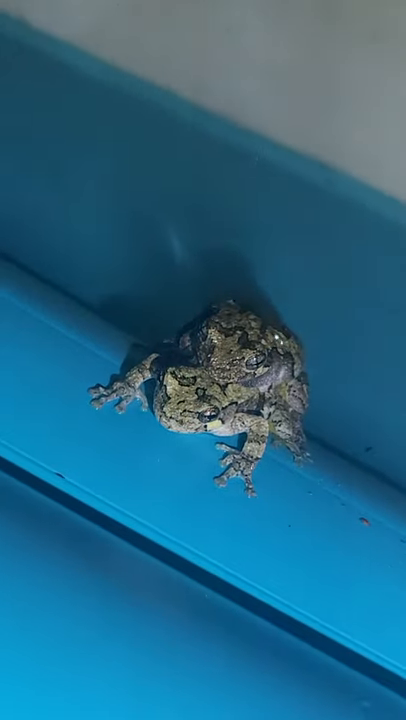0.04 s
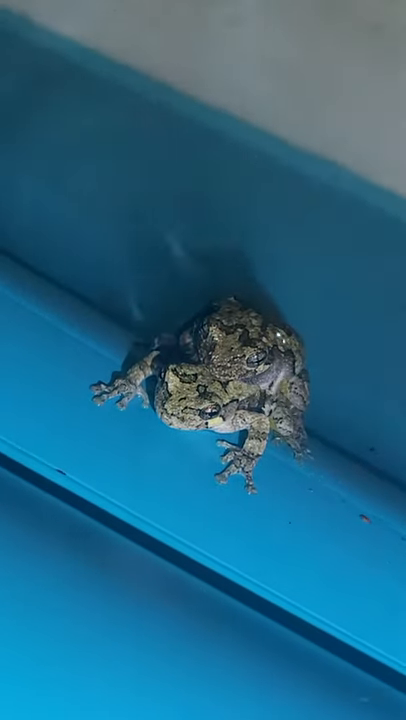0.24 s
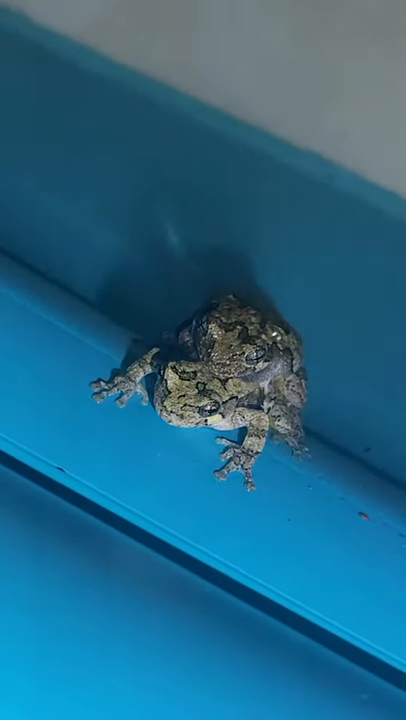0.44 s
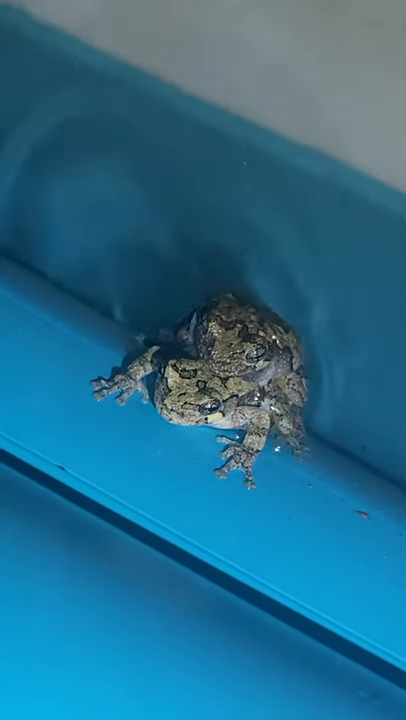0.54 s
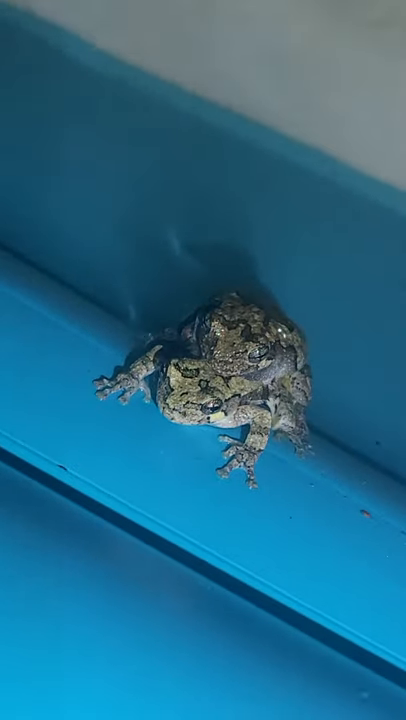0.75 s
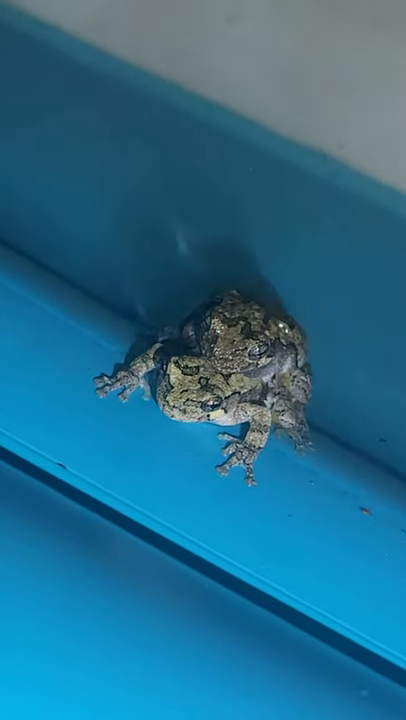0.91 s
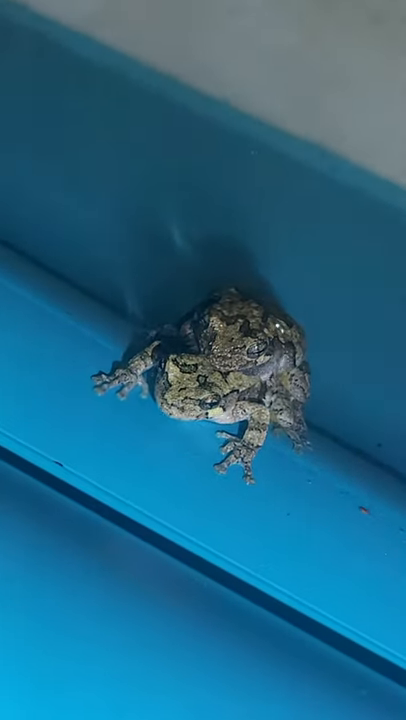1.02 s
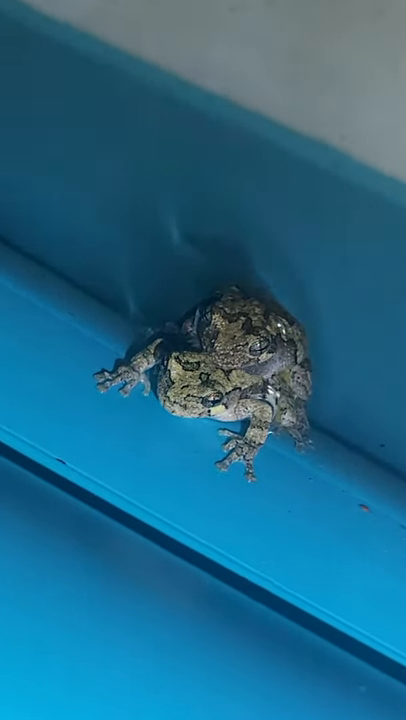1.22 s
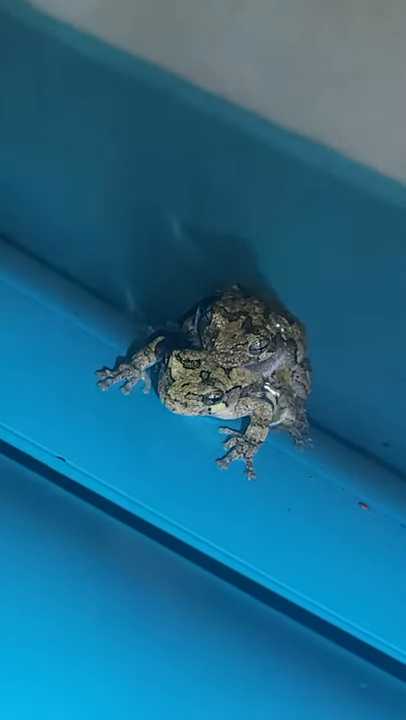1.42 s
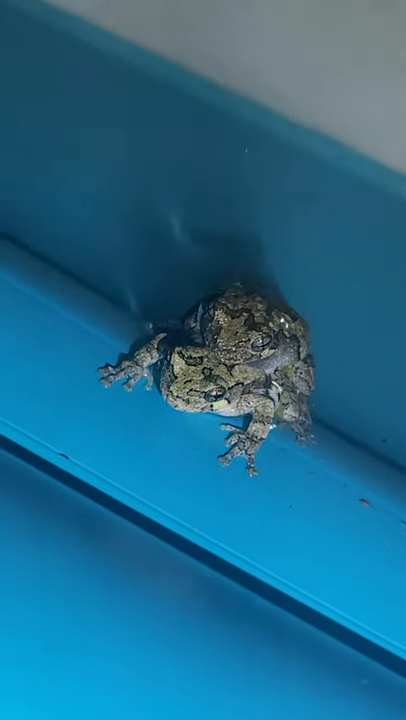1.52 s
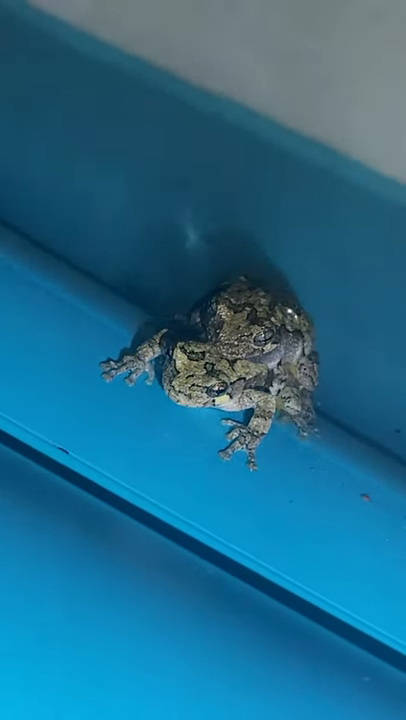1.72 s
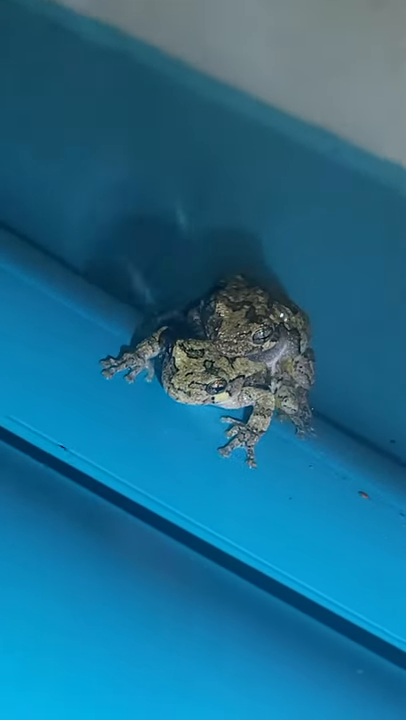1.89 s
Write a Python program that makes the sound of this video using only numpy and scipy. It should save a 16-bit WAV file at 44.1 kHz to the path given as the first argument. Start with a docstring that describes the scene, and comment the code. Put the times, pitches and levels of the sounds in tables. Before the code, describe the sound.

A tree frog trills once, loud and close, from about 0.2 to 0.7 seconds: a rapid, even row of high chirping pulses that swells quickly and stops with a very brief echo. Just before it, at 0.1 seconds, comes a soft double microphone bump, with a fainter bump near 1.7. A quiet outdoor hiss, faint distant night chorus and low rumble continue until about 2 seconds.

```python
"""Outdoors at night, a tree frog on a plastic ledge gives one loud trill, close by.
The trill is a row of pulses, each a short upward chirp with a snap that rings the frog's throat pouch.
In most pulses the octave (twice the pitch) is far louder than the base tone. Nearby walls answer briefly.
Behind the frog lie a quiet hiss, a far chorus, a low rumble and a few soft bumps."""
import sys
import numpy as np
from scipy import signal
from scipy.fft import rfft, irfft
from scipy.io import wavfile
from scipy.ndimage import uniform_filter1d

SR = 44100
rng = np.random.default_rng(int(sys.argv[2]) if len(sys.argv) > 2 else 0)


def pcm_store(signal):
    """Save signal as 16-bit PCM."""
    levels = np.round(np.clip(np.atleast_2d(signal), -1, 1) * 32767)
    wavfile.write(sys.argv[1], SR, levels.astype(np.int16).T)


N = 85995
TIME = np.arange(N) / SR
FREQS = np.maximum(np.arange(N // 2 + 1) * SR / N, 1)

# how alike the background is in both ears: (frequency [Hz], likeness [1 = same, 0 = unrelated])
EAR_LIKENESS = [(60, .95), (130, 0.95), (300, 0.89), (700, 0.17), (2000, -0.13), (3000, -.1),
                (6000, -0.079), (14000, -0.1)]


def from_db(db):
    """Turn decibels into a number to multiply by."""
    return 10 ** (np.asarray(db) / 20)


def rms_one(x):
    """Scale a sound so that its average strength (rms) is one."""
    return x / np.sqrt(np.mean(x ** 2) + 1e-20)


def along(rows, at):
    """Read a table between its rows, looking up `at` in the first column."""
    first, *columns = np.transpose(rows)
    return [np.interp(at, first, column) for column in columns]


def over_hz(points):
    """Read a table at every frequency, giving each octave equal room."""
    hz, values = np.transpose(points)
    return np.interp(np.log(FREQS), np.log(hz), values)


def pan(db):
    """Left and right gains that make the left louder by `db`."""
    return from_db(np.array([[.5], [-.5]]) * db)


def resonate(x, hz, width_hz):
    """Let a sound ring around one pitch, with gain one at that pitch."""
    r = np.exp(-np.pi * width_hz / SR)
    feedback = [1, -2 * r * np.cos(2 * np.pi * hz / SR), r * r]
    return signal.lfilter(np.array([1, 0, -1]) * (1 - r * r) / 2, feedback, x + 1e-18)


def noise(spectrum, pan_db=0, likeness=EAR_LIKENESS):
    """Stereo noise of strength one, with a given tone colour, balance and likeness between the ears."""
    mid, side = rfft(rng.standard_normal((2, N)))
    alike = np.clip(over_hz(likeness), -1, 1)
    both = np.sqrt(1 + alike) * mid + np.sqrt(1 - alike) * side * [[1], [-1]]
    return rms_one(irfft(both * from_db(over_hz(spectrum)) * pan(pan_db), N))


def delay(x, ms):
    """The same sound, later."""
    return irfft(rfft(x) * np.exp(-2j * np.pi * FREQS * ms / 1000), N)


def far_chorus():
    """Other night callers, far away, blur into narrow bands of noise."""
    # the callers' bands: (pitch [Hz], width [Hz], level next to the hiss [dB])
    bands = [(2014, 86, -15.5), (3007, 340, -4), (6659, 150, -13)]
    chorus = 0
    for hz, width, db in bands:
        band = resonate(rng.standard_normal((2, N)), hz, width)
        chorus += from_db(db) * rms_one(resonate(band, hz, 2 * width))
    return chorus


def night_hiss():
    """A quiet hiss swells and fades together with the far chorus; its airy top drifts on its own."""
    # tone colour of the hiss and of its airy top: (frequency [Hz], relative level [dB])
    hiss_colour = [(200, 0), (400, -2.5), (700, -4.5), (1100, -8), (1700, -5.5), (2050, -3.5), (2400, -6.5),
                   (3700, -4), (4600, 2), (5700, .5), (6300, -2), (6750, -1.5), (7300, -21.5),
                   (9500, -26.5), (15800, -25)]
    air_colour = [(7000, -26), (9500, -16), (11500, 0.5), (15800, 1.5)]
    # loudness of each: (time [s], level [dB])
    hiss_level = [(0, -45), (.2, -42.5), (.32, -51), (.9, -53), (1.05, -54), (1.22, -52), (1.42, -49),
                  (1.58, -47.5), (1.78, -48), (1.95, -49.5)]
    air_level = [(0, -57), (.22, -55), (.75, -60.5), (.92, -57.5), (1.06, -65.5), (1.2, -62.5), (1.45, -54),
                 (1.75, -54), (1.87, -64), (1.95, -63)]
    hiss = from_db(along(hiss_level, TIME)[0]) * (far_chorus() + noise(hiss_colour))
    air = from_db(along(air_level, TIME)[0]) * noise(air_colour)
    return hiss + air


def rumble():
    """Deep noise that dips during the trill and slowly comes back."""
    # tone colour: (frequency [Hz], relative level [dB])
    colour = [(22, -24), (34, -14), (43, 1), (62, 2), (82, -6.5), (108, -1.5), (138, -14.5), (170, -11),
              (210, -20), (320, -29), (700, -36.5), (1500, -52)]
    # loudness: (time [s], level [dB])
    level = [(0, -37.5), (.22, -42), (.3, -56), (.4, -50.5), (.7, -48.5), (.85, -47), (1.1, -44),
             (1.22, -45), (1.35, -42.5), (1.5, -45), (1.72, -42.5), (1.95, -44.5)]
    return from_db(along(level, TIME)[0]) * noise(colour)


def bumps():
    """Each soft bump on the microphone is a low swing that dies quickly, with a little scuff."""
    # the bumps: (start [s], peak level [dB], pitch [Hz])
    hits = [(0.087, -29, 143), (0.113, -28.5, 136), (1.677, -36.5, 129)]
    rise_s, scuff_db, scuff_top_hz = 0.0024, -12, 477
    keep_lows = signal.butter(3, scuff_top_hz, fs=SR, output="sos")
    scuff = from_db(scuff_db) * rms_one(signal.sosfilt(keep_lows, rng.standard_normal((2, N))))
    out = 0
    for start, db, hz in hits:
        age = np.maximum(TIME - start, 0)
        loudness = from_db(db) * age / rise_s * np.exp(1 - age / rise_s)
        out += loudness * (np.sin(2 * np.pi * hz * age) + scuff)
    return out


def voice_phase(glide):
    """How far the voice's vibration has turned, in radians; its pitch glides and wavers a little."""
    # base tone at the pulse peaks, rising as the throat fills: (time [s], pitch [Hz])
    pitch = [(.215, 1166), (.239, 1322), (.262, 1351), (.3, 1372), (.39, 1409), (.49, 1420), (.71, 1406)]
    waver_depth, waver_band_hz = 0.0069, [155, 310]
    keep_band = signal.butter(2, waver_band_hz, "band", fs=SR, output="sos")
    waver = rms_one(signal.sosfilt(keep_band, rng.standard_normal(N)))
    hz = along(pitch, TIME)[0] * glide * (1 + waver_depth * waver)
    return 2 * np.pi * np.cumsum(hz) / SR


def throat_pouch(pulse_time, phase, base_db):
    """A snap at the top of each pulse rings the frog's throat pouch (its vocal sac)."""
    # the pouch's ringing tones: (pitch [Hz], width [Hz], gain [dB])
    rings = [(1142, 170, -10), (1627, 217, 11), (3040, 620, 11.5)]
    snap_at, snap_width, octave_db, limit_db = 0.07, 0.34, -6.5, -12
    burst = np.exp(-((pulse_time - snap_at) / snap_width) ** 2)
    strength = from_db(np.minimum(base_db, limit_db))   # grows with the base tone, up to a limit
    snap = strength * burst * (np.sin(phase) + from_db(octave_db) * np.sin(2 * phase))
    return sum(from_db(db) * resonate(resonate(snap, hz, width), hz, width) for hz, width, db in rings)


def voice_rasp(octave_gain, pulse_db):
    """A fine rasp rises and falls with the octave, stronger in the louder pulses."""
    # tone colour: (frequency [Hz], relative level [dB])
    colour = [(700, -30), (1100, -10.5), (2200, -14.5), (3300, -0.5), (3750, -6), (4300, 9), (4900, -6.5),
              (5900, 0.5), (7900, -27), (8400, -11.5), (9900, -2.5), (11200, -12.5), (12800, -19),
              (13450, 4), (14300, -15.5), (15700, -23)]
    # which side it leans to: (frequency [Hz], left minus right [dB])
    balance = [(4000, -1.5), (8500, 5), (10000, -8.5), (13500, -10.5)]
    # how alike it is in both ears: (frequency [Hz], likeness [1 = same])
    likeness = [(1000, .6), (14000, 0.44)]
    loudness = from_db(pulse_db - 32) * octave_gain ** 0.72
    return loudness * noise(colour, over_hz(balance), likeness)


def voice():
    """One vibration swells and glides up in each pulse; gives a lower part, an upper part and a rasp."""
    # the pulses of the trill: (peak time [s], base tone level [dB], octave level [dB])
    pulses = [(0.2167, -19, -18), (.239, -5.5, -15), (0.2593, -4.5, -4.5), (0.2799, -12.5, -2.5),
              (0.2982, -14, -1.6), (0.3179, -15, -1), (0.3378, -17.5, -0.5), (.358, -14, -1.5),
              (0.3773, -16, -0.47), (.397, -16, -0.9), (0.4158, -14.5, -1.2), (.4357, -15.5, -0.55),
              (0.4539, -17, -0.7), (0.4739, -14.5, -1.55), (0.494, -16, -0.7), (0.5124, -15.5, -1.3),
              (0.53, -18.5, -0.92), (0.5508, -15, -1), (0.569, -16, -1.54), (0.5893, -15.5, -1.27),
              (.6083, -17.5, -1.9), (0.6265, -14.5, -1.04), (0.6473, -14.5, -0.97), (0.6658, -16.5, -0.74),
              (0.6855, -14.5, -1.1857), (0.7068, -17.5, -0.6)]
    # course of a pulse: (time from peak before stretching [ms], pitch [ratio], base tone [dB], octave [dB])
    shape = [(-6, .923, -35.5, -48), (-5.5, .96, -10.5, -31.5), (-4, .95, -4, -8), (-3, .935, -2, -7),
             (-1.4, .972, -2.5, -1.16), (0, 1, -1.5, -0.3), (1, 1.04, 0.5, -2.5), (3, 1.075, -10, -16.5),
             (5, 1.055, -19, -21), (9, .953, -31, -49.5)]
    # early pulses swell faster, and some ring longer: (time [s], rise length [ratio], fall length [ratio])
    stretch = [(.215, 0.8, 0.56), (.24, 0.653, 1.7), (.26, 0.63, 1.26), (.3, 0.95, .95), (.6, .98, 1.0),
               (.71, 0.812, 0.87)]
    # weak higher tones: (pitch [multiple of the base tone], level next to the octave [dB])
    overtones = [(3, -31.5), (4, -38.5), (5, -52.5)]
    peak_s, base_db, octave_db = np.transpose(pulses)
    nearest = np.searchsorted((peak_s[1:] + peak_s[:-1]) / 2, TIME)   # which pulse each moment is in
    from_peak_ms = (TIME - peak_s[nearest]) * 1000
    rise, fall = along(stretch, TIME)
    pulse_time = from_peak_ms / np.where(from_peak_ms < 0, rise, fall)
    glide, base_shape_db, octave_shape_db = along(shape, pulse_time)
    in_pulse = (pulse_time > shape[0][0]) & (pulse_time < shape[-1][0])
    sounding = uniform_filter1d(in_pulse.astype(float), size=40)   # soft edges avoid clicks
    base_gain = sounding * from_db(base_db[nearest] + base_shape_db)
    octave_gain = sounding * from_db(octave_db[nearest] + octave_shape_db)
    phase = voice_phase(glide)
    lower = base_gain * np.sin(phase) + throat_pouch(pulse_time, phase, base_db[nearest])
    high_tones = sum(from_db(db) * np.sin(multiple * phase) for multiple, db in overtones)
    upper = octave_gain * (np.sin(2 * phase) + high_tones)
    return lower, upper, voice_rasp(octave_gain, octave_db[nearest])


def frog():
    """The voice leaves the body and reaches the left ear first; echoes and fading tails follow."""
    # how well the body sends out sound: (frequency [Hz], gain [dB])
    body = [(600, -28.5), (900, -12.5), (1080, -1.5), (1800, -0.5), (2130, -14), (2400, -1), (3000, 0),
            (3300, 4.5), (3700, -7.5), (4200, -0.5)]
    lower, upper, rasp = voice()
    lower, upper = irfft(rfft(np.array([lower, upper])) * from_db(over_hz(body)), N)
    left, right = lower * pan(db=-3) + upper * pan(db=0.86) + rasp
    direct = np.array([left, delay(right, ms=0.123)])
    near_lower = from_db(-12.5) * tail(lower + rasp[1], fade_s=0.21)
    near_upper = from_db(-22.5) * tail(upper, fade_s=0.2)
    far = from_db(-32.5) * tail(upper, fade_s=0.52)   # the octave lingers faintly outdoors
    return direct + wall_echoes(lower, upper) + near_lower + near_upper + far


def tail(x, fade_s, start_s=0.006):
    """Many reflections, different in each ear, fall 60 dB in `fade_s`; in all as strong as the sound."""
    age = TIME[:N // 3]
    reflections = rng.standard_normal((2, len(age))) * from_db(-60 * age / fade_s) * (age > start_s)
    reflected = signal.fftconvolve(x[None], reflections, axes=1)[:, :N]
    return reflected / reflected.std(axis=1, keepdims=True) * x.std()


def wall_echoes(lower, upper):
    """Nearby walls throw back late, quiet copies of the voice."""
    # the echoes: (delay [ms], left gain [dB], right gain [dB], extra gain for the lower part [dB])
    walls = [(11.397, -33.5, -23.5, -5.5), (15.72, -19.5, -43, 8), (52, -28.5, -36, -8.5)]
    echoes = 0
    for ms, left_db, right_db, lower_db in walls:
        echo = delay(from_db(lower_db) * lower + upper, ms)
        echoes += echo * from_db([[left_db], [right_db]])
    return echoes


def scene():
    """The frog in front of the sounds of the night."""
    return frog() + night_hiss() + rumble() + bumps()


def record(dry):
    """Flatten any peak beyond full scale, then cut the very highest treble."""
    stop_db, stop_hz = 80, 16200
    cut_treble = signal.cheby2(24, stop_db, stop_hz, fs=SR, output="sos")
    return signal.sosfilt(cut_treble, np.clip(dry, -1, 1))


dry = scene()
out = record(dry)
pcm_store(out)
```